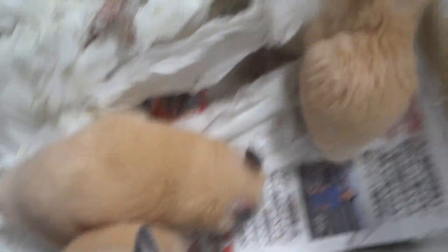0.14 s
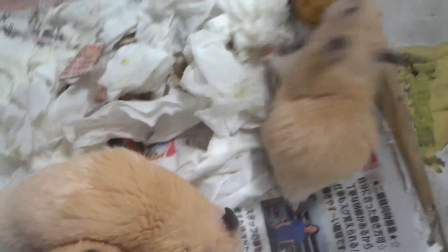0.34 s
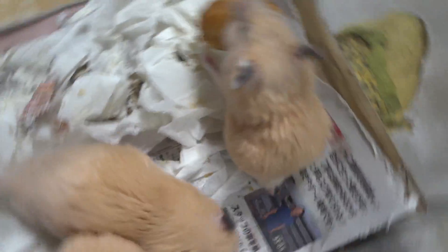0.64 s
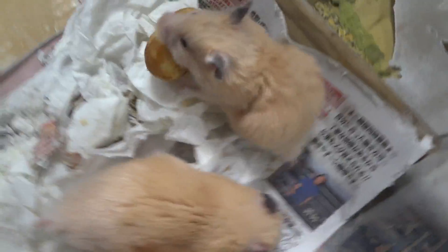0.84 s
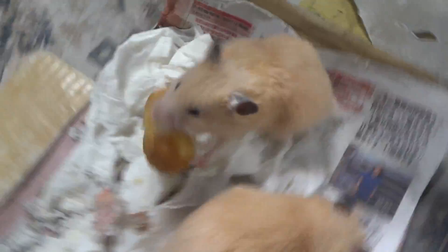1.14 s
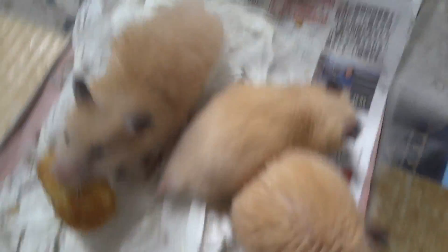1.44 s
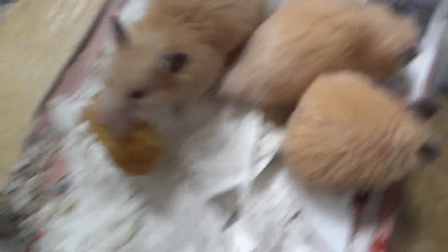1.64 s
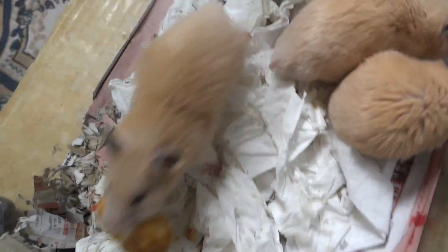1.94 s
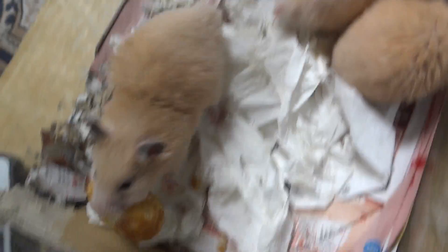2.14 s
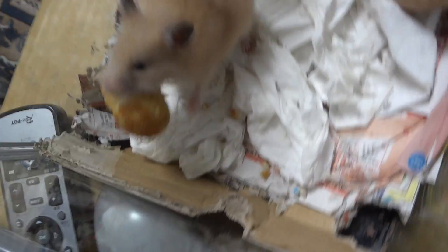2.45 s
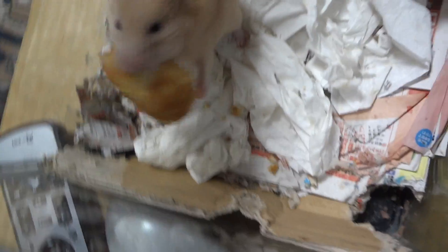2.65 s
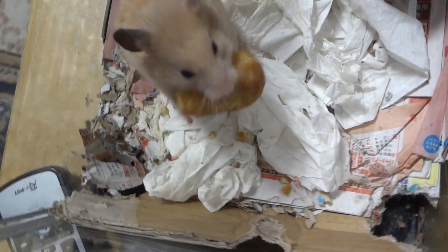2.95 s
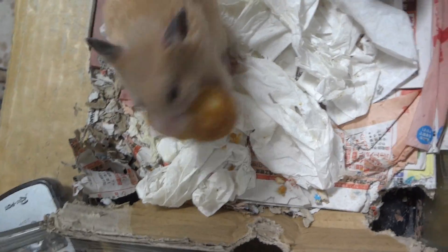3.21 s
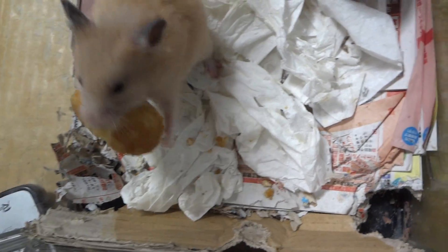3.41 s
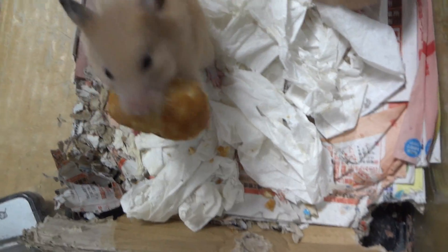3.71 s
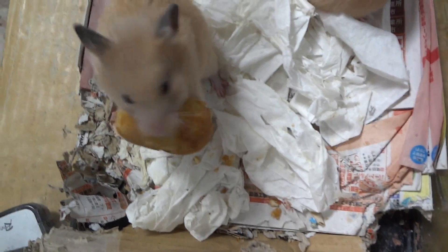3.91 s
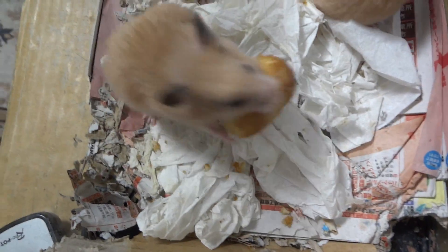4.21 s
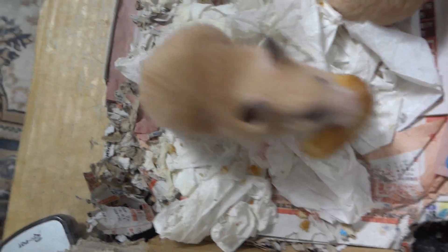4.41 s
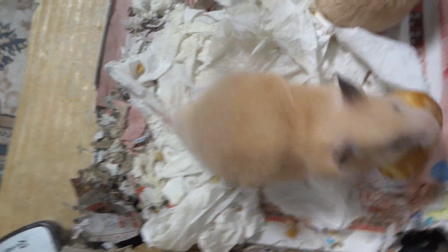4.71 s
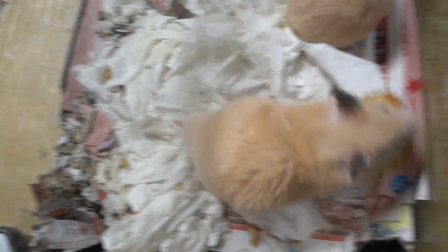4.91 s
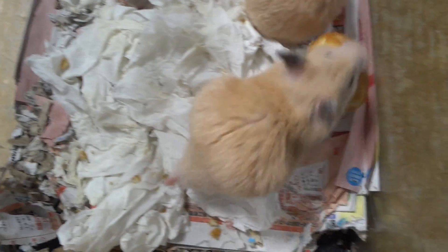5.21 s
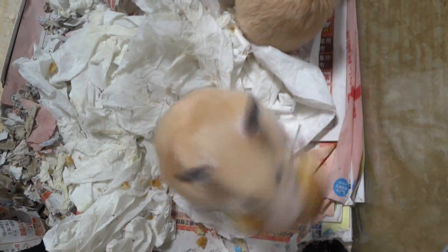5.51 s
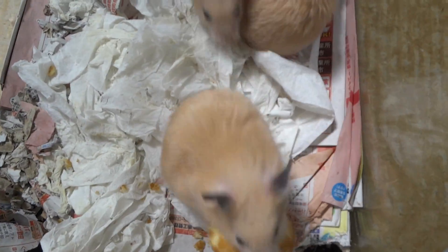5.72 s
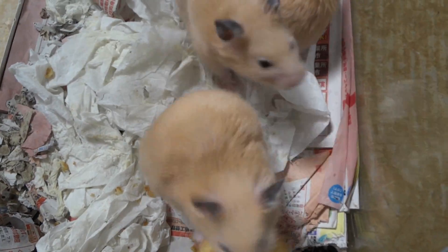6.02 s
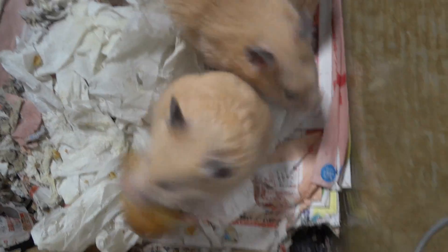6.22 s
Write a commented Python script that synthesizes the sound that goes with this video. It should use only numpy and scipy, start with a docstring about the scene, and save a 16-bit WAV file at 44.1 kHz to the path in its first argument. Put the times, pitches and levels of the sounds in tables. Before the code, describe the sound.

Hamsters move over crumpled tissue and newspaper in a shallow tray, heard very close in a small indoor room. From 0 to 0.6 s the rustling is loudest: crisp, crackly bursts with bright crease snaps, strongest near 0.24 s, and light knocks. Further shoves come around 0.9 and 1.3 s, then softer swishing to 2.1 s. A lump of food drags, giving a hollow woody knock at about 2.35 s and a snap at 2.5 s. At 2.75 to 2.8 s comes the biggest event, a quick double thump with gritty scraping and a low table boom that lingers. From 3 to 4.3 s it is nearly still, with tiny ticks and faint taps. Rustling returns from 4.4 s, with soft bumps, a fuller dull thud at 5.2 s, and shuffling until 6.3 s. Faint air noise, wavering low hum and handling rumble lie beneath.

```python
"""Hamsters on paper in a shallow tray

Hamsters scurry over crumpled tissue and newspaper, close to a hand-held camera. Paper rustles as
noise broken into tiny bursts, and creases snap as ticks with pitched bursts. Paws and a dragged lump of
food drive the resonant modes of the tray, and the lump grinds on its rim and drops with a double thump
that booms in the table. Behind lie shaped noise for room air, a wavering mains hum and handling rumble."""
import sys
import numpy as np
from scipy import signal
from scipy.fft import rfft, irfft, next_fast_len
from scipy.io import wavfile
from scipy.ndimage import uniform_filter1d

SR = 44100
rng = np.random.default_rng(int(sys.argv[2]) if len(sys.argv) > 2 else 0)


def decibels_to_gain(level_db):
    """Convert a level in decibels to a linear amplitude gain (20 dB per decade)."""
    exponent = np.asarray(level_db, float) / 20
    return 10 ** exponent


def unload_wav(signal):
    """Save mono or channel-first audio to the path in sys.argv[1] as 16-bit WAV at rate SR, clipped to [-1, 1]."""
    wavfile.write(
        sys.argv[1],
        SR,
        np.round(np.clip(np.atleast_2d(signal).T, -1, 1) * 32767).astype(np.int16),
    )


N = 280343  # samples
M = next_fast_len(N)  # Fourier length in samples
T = np.arange(N) / SR  # time in s

# Spectrum of crisp paper. Each row: frequency in Hz, relative density in dB per Hz.
PAPER_SPECTRUM = [(710, -18), (1200, -13), (1610, -3.5), (2000, -3), (2920, -1.5), (5500, -1.5),
                  (10600, -5.5), (11200, -17.5), (11500, -27), (22000, -120)]
# Spectrum of whole sheets swishing. Each row: frequency in Hz, relative density in dB per Hz.
SHEET_SPECTRUM = [(210, -39), (350, -15), (481, -12.5), (555, -2.5), (888, 1), (1370, -1), (1670, -8),
                  (2200, -13), (3380, -30), (5720, -120)]
# A body shoves the paper. Each row: peak time in seconds, crisp rustle in dB, rise in seconds per 10 dB,
# fall in seconds per 10 dB, spectral tilt in dB per octave.
PAPER_SHOVES = [(0.0, -38, .02, .2, 0), (.14, -44, .06, .08, 2), (.2, -42, .012, .012, 0),
                (.245, -36, .012, .08, -1), (.31, -38, .08, .07, 0), (.4, -47, .06, .025, 1),
                (.53, -43, .02, .07, -2), (.83, -53, .12, .2, 3), (.93, -41, .05, .03, 1),
                (1.0, -53, .1, .15, 3), (1.26, -47, .02, .1, 5), (1.315, -41, .03, .25, 0),
                (1.61, -45, .04, .04, -1.5), (1.84, -46, .08, .14, -1), (2.13, -52, .08, .5, 0),
                (2.39, -42, .035, .04, -3.5), (2.44, -50, .02, .06, 1), (2.535, -53, .02, .05, 0),
                (2.75, -41, .004, .03, -3), (2.797, -41, .03, .025, 0), (3.45, -59, .04, .15, 6),
                (3.55, -57, .08, .03, 3), (3.71, -61, .15, .03, 6), (3.93, -57, .02, .1, 7),
                (3.98, -56, .05, .05, 6), (4.04, -58, .04, .02, 4), (4.48, -51, .12, .6, 1),
                (4.76, -54, .2, .08, -1), (4.92, -53, .1, .05, 0), (5.02, -48, .015, .2, 1),
                (5.07, -50, .04, .06, -3), (5.18, -46, .08, .05, 2), (5.3, -56, .1, .2, -2),
                (5.49, -52, .2, .1, -1.5), (5.61, -54, .03, .06, 0), (5.81, -50, .07, .05, -2),
                (5.91, -47, .04, .14, -1), (6.11, -46, .035, .12, -1.5), (6.2, -53, .05, .06, -1.5),
                (6.35, -47, .03, .1, -1)]
# Sheets swish below the crisp rustle, more under a dull shove.
SWISH_DB, SWISH_DB_PER_TILT = -8, -1.1
# Paper settles between shoves. Each row: time in seconds, crisp rustle in dB, swish of the sheets in dB.
PAPER_SETTLING = [(0, -52, -46), (.4, -52, -47), (.65, -61, -49), (.87, -56, -49), (1.0, -57, -48.5),
                  (1.24, -60, -50), (1.7, -55, -51), (2.05, -62, -57), (2.35, -62, -51), (2.58, -68, -60),
                  (2.73, -68, -62), (2.86, -57, -57), (2.96, -69, -64), (3.35, -66, -64), (3.8, -72, -65),
                  (4.1, -69, -65), (4.2, -65, -65), (4.33, -70, -65), (4.4, -65, -65), (6.36, -67, -68)]
# Single creases snap. Each row: start in seconds, level in dB, pitch in Hz,
# sharp tick relative to the pitched burst in dB.
CREASE_SNAPS = [(.1315, -23.5, 3800, 5), (.2239, -21, 8960, 2), (.2252, -20, 3280, -9),
                (.2385, -11, 3100, -1), (0.263, -21, 3240, -12), (0.3115, -20.5, 2230, 2),
                (0.321, -28, 9050, 0), (0.338, -27, 1780, -2), (.527, -30, 4000, 1), (.536, -31, 2350, -4),
                (.626, -37, 2600, -2), (.7764, -32, 1400, -4), (.883, -36, 4000, 2), (0.9177, -25, 3580, 2),
                (.925, -27, 2420, 2), (0.9345, -24, 2340, -2), (1.085, -38, 2600, 0),
                (1.3065, -31.5, 2260, 5), (1.33, -26, 7400, -5), (1.3613, -31, 5920, -5),
                (1.6013, -32, 3830, -12), (2.524, -18.5, 2000, -8), (2.8213, -28, 4520, -8),
                (2.879, -39, 5160, -2), (2.921, -43, 9400, 5), (3.1236, -44, 5700, -6),
                (3.2984, -36.5, 2300, 2.5), (3.3273, -40, 9240, -2), (3.403, -43, 10300, -6),
                (3.4238, -38, 10100, 1), (3.4516, -37, 9900, -2), (3.848, -46, 9500, -2),
                (3.86, -43, 6000, 2), (4.3628, -39.5, 4660, 0), (3.602, -45, 1400, -6),
                (4.14, -40, 1300, -8), (4.425, -39, 2600, -6), (4.6054, -36, 8000, 2),
                (4.631, -33, 3500, 5), (4.7022, -30, 4660, -5), (4.7868, -29, 2970, 6),
                (5.1506, -31, 3150, -1), (5.435, -40, 2400, 0), (5.772, -38, 2370, -2)]
# Paper scrapes and squeaks. Each row: start in seconds, level in dB, pitch in Hz, 60 dB decay in seconds.
PAPER_SCRAPES = [(1.2516, -36, 7400, .027), (2.4379, -38, 8800, .02), (2.538, -38, 1700, .022),
                 (2.758, -25, 5100, .02), (4.517, -39, 2650, .079)]
SNAP_T60_S, SCRAPE_TICK_DB = .013, -13

# Paws patter on the tray and shake it. Each row: time in seconds, relative level in dB.
PAW_PATTER = [(0.0, -42), (0.53, -44), (1.01, -56), (1.26, -44), (1.9, -44.5), (2.14, -46.5), (2.33, -41),
              (2.53, -42), (2.72, -46), (2.94, -43), (4.2, -52), (4.57, -44), (4.95, -51), (5.13, -39),
              (5.28, -40), (5.59, -47), (5.84, -42), (6.1, -54), (6.36, -54)]
# Blows and scrapes on the tray. Each row: start in seconds, force level in dB, pitch of the spot in Hz,
# swell in seconds, hard edge relative to the blow in dB.
TRAY_KNOCKS = [(.053, -33, 287, 0.02, -14), (0.232, -21, 930, 0.012, -18), (.236, -32, 600, .008, -14),
               (.31, -34, 930, .008, -8), (.327, -35, 250, 0.013, -10), (.336, -31, 930, .008, -10),
               (.345, -36, 215, .016, -20), (0.468, -39, 273, .008, -10), (0.53, -34.5, 221, .011, -17),
               (1.311, -33, 1030, 0.01, -12), (1.607, -42.5, 170, 0.013, -8), (2.225, -30, 362, 0.06, -35),
               (2.27, -28, 362, .07, -35), (2.225, -28, 203, .1, -35), (2.325, -33, 690, 0.035, -30),
               (2.345, -14, 200, 0.075, -45), (2.345, -21, 355, 0.04, -40), (2.368, -34, 1180, 0.028, -16),
               (2.374, -21.5, 678, 0.024, -20), (2.385, -17, 362, 0.04, -28),
               (2.743, -25.5, 177, 0.0093, -20), (2.742, -33, 770, .02, -20), (2.756, -22, 140, 0.01, -17),
               (2.756, -27, 440, .01, -20), (2.758, -9.5, 244.6, 0.018, -35), (2.762, -38, 1240, .013, -20),
               (2.771, -14, 300, 0.016, -20), (2.778, -29, 790, .035, -20),
               (2.787, -9.5, 242.7, 0.0296, -28), (2.79, -31, 614, .03, -20), (2.808, -34, 790, .02, -20),
               (3.297, -45.5, 170, 0.0093, -8), (3.602, -38.5, 187, 0.0086, -10),
               (3.899, -40.5, 267, .012, -18), (4.365, -44, 191, 0.018, -12), (4.612, -36, 208, 0.017, -19),
               (4.669, -35.5, 210, 0.013, -20), (5.095, -42, 520, .012, -12), (5.102, -35, 215, 0.016, -16),
               (5.149, -40, 268, 0.0095, -12), (5.19, -29, 199, 0.036, -25), (5.222, -21.5, 205, 0.05, -32),
               (5.35, -38, 200, .02, -20), (5.406, -39, 206, 0.0074, -16), (5.432, -41, 540, 0.011, -12),
               (5.489, -34, 191, 0.0075, -13), (5.607, -38.5, 246, 0.0091, -9),
               (5.656, -42, 190, .012, -12), (5.78, -44, 246, 0.0073, -20), (6.271, -41.5, 277, 0.011, -6)]
EDGE_HZ, EDGE_S = 720, .0035  # the hard edge is a brief contact that reaches the upper modes
# The lump is dragged over the tray floor until it catches. Each row: time in seconds, relative level in dB.
LUMP_DRAG = [(2.14, -60), (2.23, -45), (2.33, -41), (2.385, -36), (2.43, -55)]
STEP_FORCE_DB = -30  # offset of steps and drag
STEPS_TILT_DB, DRAG_TILT_DB = -16.5, -4  # per octave
# Modes of the tray. Each row: frequency in Hz, relative level in dB, 60 dB decay in seconds.
TRAY_MODES = [(140, -10, 0.034), (189, -13.5, 0.058), (199, -4, 0.21), (240, -8.5, 0.033), (248, -4, .16),
              (277, -3.5, 0.13), (302, -12.5, 0.08), (369, -9, 0.12), (445, -9, 0.15), (530, 2, 0.035),
              (614, -2.5, 0.072), (678, 0.5, 0.064), (790, 0, 0.085), (930, 7, 0.02), (1185, 7, 0.07)]
TRAY_LOW_HZ = 119
MODE_PAN_DB = 1.5  # neighbouring modes lean to opposite sides
# The crust of the lump grinds on the rim. Each row: time in seconds, relative level in dB.
CRUST_GRIND = [(2.36, -70), (2.39, -47), (2.43, -80), (2.74, -90), (2.746, -52), (2.762, -41), (2.774, -54),
               (2.797, -37), (2.81, -52), (2.83, -62), (2.9, -72)]
# Modes of the stiff rim. Each row: frequency in Hz, relative level in dB, 60 dB decay in seconds.
RIM_MODES = [(1720, -6, .05), (2080, -3, .06), (2570, 0, .05), (3110, -3, .05), (3390, -5, .05),
             (4080, -7, .05), (4700, -4, .015), (5330, -5, .03), (5840, -3, .03)]
# The table under the tray booms at heavy blows. Each row: start in seconds, force level in dB.
TABLE_BOOMS = [(2.761, -21)]
TABLE_HZ, TABLE_T60_S = 92.5, 0.91

# Spectrum of the room air. Each row: frequency in Hz, relative density in dB per Hz.
AIR_SPECTRUM = [(12, -45), (20, -6), (76, -16.5), (132, -9), (168, -4), (250, -0.5), (293, -5.5),
                (426, -20.5), (827, -10), (920, -34.5), (1740, -26), (8580, -32), (9300, -27.5),
                (10600, -34.5), (11500, -40), (22000, -120)]
AIR_DB = -53.5
# Likeness of the air at left and right. Each row: frequency in Hz, likeness from 0 to 1.
AIR_LIKENESS = [(60, 0.77), (270, 0.76), (580, 0), (1220, 0), (2600, 0), (5500, 0.62), (11000, 0.9)]
# Wavering mains hum. Each row: time in seconds, level in dB.
HUM_LEVELS = [(0, -65), (.5, -58), (1.2, -58.5), (2, -75), (2.5, -64), (3.3, -68), (3.75, -74), (4.1, -54),
              (4.55, -56), (4.92, -68), (5.3, -55), (5.6, -54), (6.1, -72), (6.36, -52)]
HUM_HZ = 122.5
# Deep rumble while the hand moves the camera. Each row: time in seconds, level in dB.
HANDLING_LEVELS = [(0, -56), (1, -61.5), (2, -64), (3.2, -58), (3.6, -70), (5, -70), (6.36, -65)]
ROOM_T60_S, ROOM_DB = 0.18, -15
TOP_HZ = 11150


def unit(x):
    """Normalisation: scale to an rms of 1."""
    return x / np.sqrt(np.mean(x ** 2))


def curves(table):
    """Linear interpolation: the columns of a time table at every sample."""
    s, *columns = np.transpose(table)
    return [np.interp(T, s, c) for c in columns]


def gated_gain(table):
    """Amplitude envelope: a level table as gain, silent outside its first and last times."""
    return decibels_to_gain(curves(table)[0]) * (T > table[0][0]) * (T < table[-1][0])


def across(table):
    """Interpolation over log frequency: a frequency table at every Fourier bin."""
    hz, value = np.transpose(table)
    return np.interp(np.log(np.fft.rfftfreq(M, 1 / SR) + 1), np.log(hz), value)


def colour(x, table):
    """Linear filtering: multiply the spectrum of x by that of a table."""
    return irfft(rfft(x, M) * decibels_to_gain(across(table)), M)[:N]


def walk(rate):
    """Slow random modulation: levels drawn at a rate in Hz and slewed, with an rms of 1."""
    k = int(SR / rate)
    held = np.repeat(rng.standard_normal(N // k + 1), k)
    return unit(uniform_filter1d(held, k)[:N])


def ring(x, hz, t60):
    """Damped resonance: a unit push starts a sine that decays by 60 dB in t60 seconds."""
    pole = np.exp(2j * np.pi * hz / SR - np.log(1000) / (t60 * SR))
    return signal.lfilter([0, pole.imag], [1, -2 * pole.real, abs(pole) ** 2], x)


def pan(x, db):
    """Level difference between the ears: left stands above right by db."""
    return x * decibels_to_gain(np.array([[db], [-db]]) / 2)


def spread(mid, side, side_db):
    """Sum and difference stereo: a common part plus a part of opposite sign at each side."""
    return mid + decibels_to_gain(side_db) * side * np.array([[1], [-1]])


def crinkle(rate, spread_db, burst_s):
    """Shot noise: random tiny bursts, rate a second, whose levels in dB are exponentially distributed."""
    chance, size = rng.random((2, N))
    starts = (chance < rate / SR) * decibels_to_gain(-spread_db * np.log(1 - size))
    t = T[:int(8 * burst_s * SR)] / burst_s
    envelope = signal.oaconvolve(starts, t * np.exp(-t))[:N]
    return unit(envelope * rng.standard_normal(N))


def bounce(x, lag_s, share):
    """Reflection: the sound plus its delayed, weaker return off the tray floor."""
    lag = int(lag_s * SR)
    return x + share * np.pad(x, (lag, 0))[:len(x)]


def add(force, s, db, hz, swell_s):
    """Contact force: swells and lets go, trembling at its pitch; the shorter, the more modes it reaches."""
    shape = np.hanning(int(np.clip(swell_s, .002, .1) * SR))
    at = int(s * SR)
    tremble = np.sin(2 * np.pi * hz * T[:len(shape)])
    force[at:at + len(shape)] += 2 * decibels_to_gain(db) * shape / shape.sum() * tremble


def shoves():
    """Addition of powers: each shove rises and dies exponentially over the settling paper."""
    t = T[::32]
    crisp, swish = (decibels_to_gain(db[::32]) ** 2 for db in curves(PAPER_SETTLING))
    tilt = 0
    for s, db, rise_s, fall_s, tilt_db in PAPER_SHOVES:
        drop_db = 10 * np.where(t < s, (s - t) / rise_s, (t - s) / fall_s)
        power = decibels_to_gain(db - drop_db) ** 2
        crisp = crisp + power
        tilt = tilt + tilt_db * power
        swish = swish + power * decibels_to_gain(SWISH_DB + SWISH_DB_PER_TILT * tilt_db) ** 2
    levels = 10 * np.log10(crisp), 10 * np.log10(swish), tilt / crisp
    return [np.interp(T, t, c) for c in levels]


def twangs(count, lo_hz, hi_hz, ring_s, spread_db):
    """Plate flexure: stiff facets of paper pop and ring very briefly, each at its own pitch and side."""
    out = np.zeros((2, N + SR))
    for when, pitch, size, side, length in rng.random((count, 5)):
        t = T[:int((.5 + length) * ring_s * SR)]
        hz = lo_hz + (hi_hz - lo_hz) * pitch ** 1.5
        note = np.sin(np.pi * t / t[-1]) ** 2 * np.sin(2 * np.pi * hz * t)
        at = int(when * N)
        out[:, at:at + len(t)] += pan(note * decibels_to_gain(spread_db * size), 7 * (side - .5))
    return unit(out[:, :N])


def paper():
    """Crackling noise: crisp crinkles of changing spectral tilt over the swish of whole sheets."""
    crisp_db, swish_db, tilt_db = shoves()
    fibres = spread(*(crinkle(2500, 2.8, 0.0013) for _ in range(2)), -6.5)
    ticks = pan(bounce(crinkle(120, 3.0, 0.00017), 0.00091, 0.73), -1.2) * decibels_to_gain(-10)
    facets = twangs(count=7000, lo_hz=1500., hi_hz=11000., ring_s=.012, spread_db=13.) * decibels_to_gain(-7)
    coloured = unit(np.array([colour(g, PAPER_SPECTRUM) for g in fibres + ticks + facets]))
    spectrum = rfft(coloured, M)
    octaves = np.log2((np.fft.rfftfreq(M, 1 / SR) + 1) / 4000)
    crisp = 0
    for centre in np.arange(-2.4, 2, .4):  # overlapping triangular bands
        weight = np.clip(1 - np.abs(octaves - centre) / .4, 0, 1)
        band = irfft(spectrum * weight, M)[:, :N]
        # each fold favours its own pitches for a moment
        crisp = crisp + band * decibels_to_gain(tilt_db * centre + 0.85 * walk(30))
    sheets = spread(*(crinkle(2000, 0.83, 0.0024) for _ in range(2)), -4.5)
    swish = unit(np.array([colour(g, SHEET_SPECTRUM) for g in sheets]))
    crisp = pan(crisp, -0.2) * decibels_to_gain(crisp_db)
    swish = swish * decibels_to_gain(swish_db + 0.5 * walk(25))
    return decibels_to_gain(1.2 * walk(18)) * (crisp + swish)


def tray():
    """Modal excitation: blows ring modes near their pitches; light steps and the dragged lump stir them all."""
    force = np.zeros(N)
    for s, db, hz, swell_s, edge_db in TRAY_KNOCKS:
        add(force, s, db, hz, swell_s)
        add(force, s, db + edge_db, EDGE_HZ, EDGE_S)
    steps = crinkle(500, 2.2, .002) * decibels_to_gain(curves(PAW_PATTER)[0] + STEP_FORCE_DB)
    drag = crinkle(900, 1.5, .002) * gated_gain(LUMP_DRAG) * decibels_to_gain(STEP_FORCE_DB)
    drag = signal.sosfilt(signal.butter(4, 180., "highpass", fs=SR, output="sos"), drag)
    out = 0
    for k, (hz, db, t60) in enumerate(TRAY_MODES):
        octaves = np.log2(hz / 200)
        push = force + steps * decibels_to_gain(STEPS_TILT_DB * octaves) + drag * decibels_to_gain(DRAG_TILT_DB * octaves)
        out = out + decibels_to_gain(db) * pan(ring(push, hz, t60), 0.8 + MODE_PAN_DB * (-1) ** k)
    # a small tray radiates no deep bass
    return signal.sosfilt(signal.butter(2, TRAY_LOW_HZ, "highpass", fs=SR, output="sos"), out)


def air():
    """Partial coherence: shaped noise, more alike at left and right in bass and treble than between."""
    alike = np.clip(across(AIR_LIKENESS), 0, 1)
    parts = []
    for sign in (1, -1):  # common part, then differing part
        noise = rfft(rng.standard_normal(M))
        parts.append(irfft(noise * decibels_to_gain(across(AIR_SPECTRUM)) * np.sqrt(1 + sign * alike), M)[:N])
    return unit(spread(*parts, 0)) * decibels_to_gain(AIR_DB + 0.27 * walk(6))


def mains_hum():
    """Frequency modulation: a sine whose pitch wanders slowly while its level wavers."""
    phase = 2 * np.pi * np.cumsum(HUM_HZ + 1.15 * walk(4.08)) / SR
    return np.sqrt(2) * decibels_to_gain(curves(HUM_LEVELS)[0]) * np.sin(phase)


def handling():
    """Structure-borne sound: band-limited low noise murmurs through the camera body."""
    band = signal.butter(2, [24., 60.], "bandpass", fs=SR, output="sos")
    rumble = signal.sosfilt(band, rng.standard_normal(N))
    return pan(unit(rumble) * decibels_to_gain(curves(HANDLING_LEVELS)[0]), 1.4)


def room(x):
    """Reverberation: convolution with a short decaying noise tail, different for each channel."""
    t = T[:SR // 2]
    tails = rng.standard_normal((2, len(t))) * np.exp(-np.log(1000) * t / ROOM_T60_S) * (t > .003)
    tails = tails / np.sqrt(np.sum(tails ** 2, axis=1, keepdims=True))
    return decibels_to_gain(ROOM_DB) * signal.fftconvolve(x, tails, axes=1)[:, :N]


def snaps():
    """Sudden release of strain: each crease gives a sharp wide tick and a noise burst round its own pitch."""
    out, t = np.zeros(N), T[:4000]
    creases = [(s, db, hz, SNAP_T60_S, tick_db) for s, db, hz, tick_db in CREASE_SNAPS]
    scrapes = [(*row, SCRAPE_TICK_DB) for row in PAPER_SCRAPES]
    for s, db, hz, t60, tick_db in creases + scrapes:
        noise = rng.standard_normal((2, len(t)))
        shape = (1 - np.exp(-t / (0.045 * t60))) * np.exp(-np.log(1000) * t / t60)
        # a short snap spreads wide in frequency, a long one keeps to its pitch
        burst = np.diff(noise[0] * shape, prepend=0)
        burst = ring(ring(burst, hz, 0.11 * t60), hz, 0.11 * t60)
        burst = burst * np.sqrt(np.sum(shape ** 2) / np.sum(burst ** 2)) / shape.max() * 0.34
        tick = np.diff(noise[1] * np.sqrt(t / .0004) * np.exp(-t / 0.00064), prepend=0)
        tick = bounce(tick, rng.uniform(0.00073, .0008), .8)
        tick = decibels_to_gain(tick_db) * tick / np.abs(tick).max()
        at = int(s * SR)
        out[at:at + len(t)] += decibels_to_gain(db) * (burst + tick)[:N - at]
    return pan(out, -2.2)


def rim():
    """Frictional excitation: dense gritty contacts ring the modes of the rim."""
    grit = crinkle(2500, 2.2, .0004) * gated_gain(CRUST_GRIND)
    out = 0
    for k, (hz, db, t60) in enumerate(RIM_MODES):
        mode = ring(grit, hz, t60) / np.sqrt(t60 * SR / 28)  # evens out long and short ringing
        out = out + decibels_to_gain(db) * pan(mode, 2.5 * (-1) ** k)
    return out


def table():
    """Single resonance: the boom builds while the force swells, then rings long."""
    force = np.zeros(N)
    for s, db in TABLE_BOOMS:
        add(force, s, db, TABLE_HZ, 0.037)
    return pan(ring(force, TABLE_HZ, TABLE_T60_S), 1.3)


def scene():
    """Superposition: paper and tray with their reverberation, the table below, air, hum and rumble behind."""
    crisp = paper() + snaps() + rim()
    drum = tray()
    reverberation = room(crisp + decibels_to_gain(-6.5) * drum)
    return crisp + drum + reverberation + table() + air() + mains_hum() + handling()


def top_cut(x):
    """Nothing passes above the cut-off."""
    return signal.sosfilt(signal.butter(12, 12360, fs=SR, output="sos"), x)


def record(dry):
    """Low-pass filtering: the camera cuts the top steeply with an elliptic filter."""
    steep = signal.ellip(10, .3, 60, TOP_HZ, fs=SR, output="sos")
    mix = signal.sosfilt(steep, dry)
    return top_cut(mix)


dry = scene()
out = record(dry)
unload_wav(out)
```